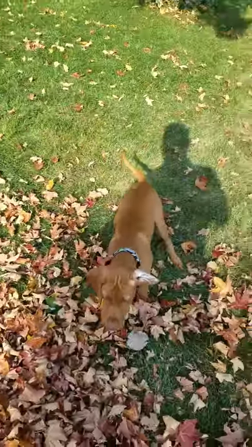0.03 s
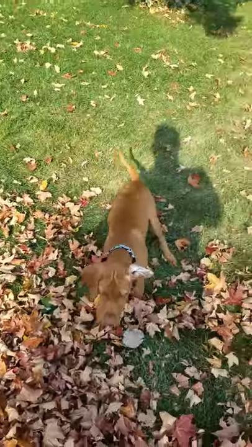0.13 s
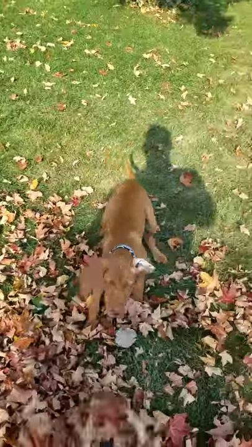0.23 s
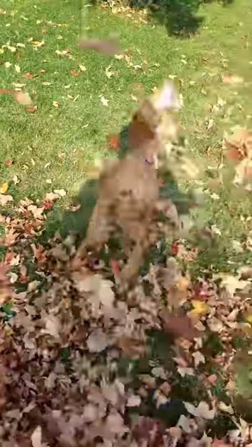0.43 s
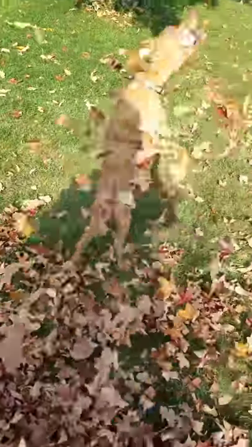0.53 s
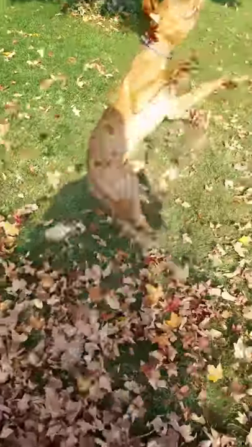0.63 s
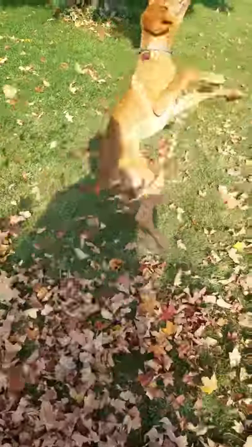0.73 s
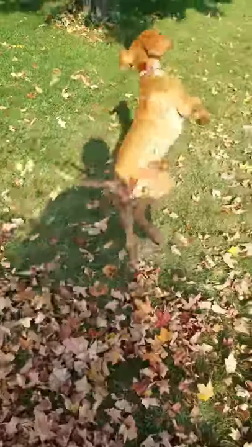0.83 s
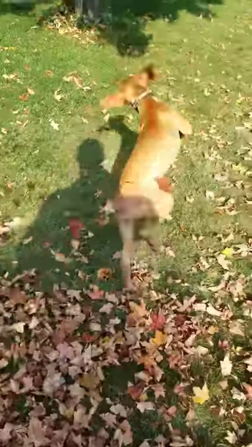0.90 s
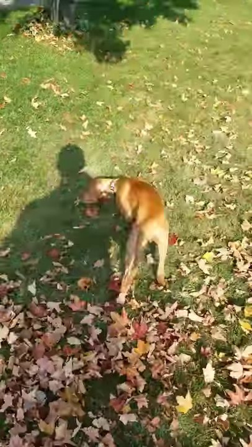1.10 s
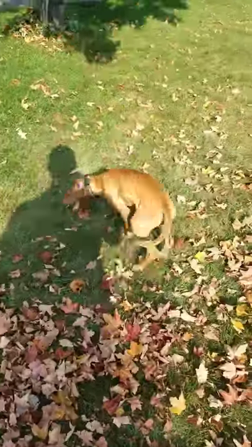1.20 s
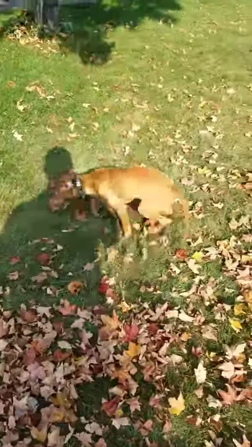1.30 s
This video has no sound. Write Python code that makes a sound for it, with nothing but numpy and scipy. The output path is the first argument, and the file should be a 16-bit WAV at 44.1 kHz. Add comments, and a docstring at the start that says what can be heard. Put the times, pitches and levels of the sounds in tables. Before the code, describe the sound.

A pile of dry leaves is kicked up with a loud swish close to the microphone, outdoors on grass. As the leaves flutter down, soft handling bumps come in, with a dog's crunching paw steps and a short huff.

```python
"""On a lawn, a foot ploughs into dry leaves and kicks them up. They patter down as a dog leaps, lands
and huffs. The rustle is thousands of tiny cracks, each reaching the two microphones from its own
direction, mostly from the right. Paws and a shoe thud on the turf, and the huff is a puff of noise
shaped by the dog's muzzle. A hand softly bumps the camera on the right, over a faint outdoor hiss."""
import sys
import numpy as np
from scipy import signal
from scipy.fft import rfft, irfft, next_fast_len
from scipy.io import wavfile
from scipy.ndimage import map_coordinates

SR = 44100
rng = np.random.default_rng(int(sys.argv[2]) if len(sys.argv) > 2 else 0)


def bounce(signal):
    """Save signal as a 16-bit WAV file at the path given by the first command-line argument."""
    frames = np.transpose(np.atleast_2d(signal))
    limited = np.clip(frames, -1, 1)
    pcm = np.round(limited * 32767).astype(np.int16)
    wavfile.write(sys.argv[1], SR, pcm)


N = 59535
TOP_HZ = 15750  # the highest pitch in the scene

# How loud the kick is. Each row: time in seconds, level in dB.
KICK_LEVEL = [(.12, -51), (.165, -38), (.198, -31), (.245, -26), (.30, -19), (.335, -19.5), (.363, -26.5),
              (.39, -39.5), (.46, -48)]
# Swells of sound. Each row: time of the peak in seconds, level in dB, rise and decay in seconds.
SHOE_SWELLS = [(.848, -34, 0.055, 0.051), (.947, -41, 0.0047, .007)]
PAW_SWELLS = [(.957, -38.5, .004, 0.0065), (.983, -46, 0.0037, 0.0113), (1.04, -39.5, 0.0095, 0.014),
              (1.06, -36.5, 0.0049, 0.0051), (1.069, -32.5, 0.0036, 0.013), (1.094, -39.5, 0.032, 0.041),
              (1.143, -35.5, 0.0065, 0.011), (1.165, -40.5, 0.014, 0.019), (1.206, -41.5, 0.012, 0.007),
              (1.213, -32.5, 0.0033, 0.0086), (1.236, -40.5, 0.0073, .008), (1.31, -37, 0.031, 0.02)]
HUFF_SWELLS = [(1.275, -42.5, 0.014, 0.023), (1.322, -38.5, 0.025, 0.017)]
# Single stems snap. Each row: time in seconds, strength in dB.
STEM_SNAPS = [(0.046, -43), (.105, -30), (.685, -29), (0.76, -45), (0.876, -44), (1.013, -35)]
# Paws and shoe hit the turf. Each row: time in seconds, strength in dB, pitch in Hz.
TURF_THUDS = [(.768, -35, 125), (.821, -35, 130), (.889, -43, 130), (1.122, -45, 130), (1.157, -40, 120),
              (1.314, -34, 220)]
# The hand bumps the camera. Each row: time in seconds, strength in dB.
HAND_BUMPS = [(0.679, -31.5), (0.704, -30), (.707, -24), (0.715, -33), (.735, -32), (.768, -32),
              (.782, -29.5), (0.819, -24), (.829, -32), (.841, -25), (0.864, -30), (.889, -32), (.926, -33),
              (0.946, -34), (1.157, -32), (1.173, -31.5), (1.215, -27), (1.227, -26.5), (1.331, -45),
              (1.342, -24)]
# How loud the moving hand rumbles. Each row: time in seconds, level in dB.
RUMBLE_LEVEL = [(0, -60), (.6, -59), (.71, -45.5), (.85, -47.5), (.98, -54.5), (1.1, -57), (1.22, -48),
                (1.27, -55), (1.34, -43)]

# The tone of each sound, from bass to treble. Each row: frequency in Hz, boost or cut in dB.
KICK_TONE = [(100, -16), (200, -18), (350, -4.5), (900, -2), (1800, 0.5), (3500, -2.5), (4800, 1),
             (7000, 1.5), (9000, -5), (11500, -1), (15500, -1)]
FALL_TONE = [(100, -15.5), (250, -8), (600, -2), (1200, -1.5), (2200, 2), (6000, -0.5), (9000, -4.5),
             (12000, -3), (15500, -0.5)]
PILE_TONE = [(100, -1), (400, -3), (800, 2.5), (1500, -4), (3200, -0.5), (4300, -3.5), (6000, 0.5),
             (9000, -15), (15000, -12.5)]
SHOE_TONE = [(100, -3), (500, -4), (1200, 5.5), (2300, 2), (3400, -0.5), (4200, -4), (5200, 0.5),
             (7000, -1.5), (9000, -6), (13000, -2.5), (15500, -4)]
PAW_TONE = [(100, -4), (400, -9), (1400, -2.5), (3000, -2.5), (7000, -5), (9500, -8.5), (13000, -5),
            (15500, -3.5)]
HUFF_TONE = [(300, -9), (900, -14), (1300, 0.5), (1550, -5), (1800, -1), (2200, -18), (4000, -32),
             (9000, -52)]
RUMBLE_TONE = [(20, -20), (45, -19), (90, 6.5), (160, -11), (350, 2), (700, -5), (2000, -24.5)]
AIR_TONE = [(100, 4.5), (500, 0.5), (1500, -0.5), (6000, -9), (9000, -10), (15000, -4)]

# How much later the left microphone hears the leaves as they fly away, and the dog as it moves off.
# Each row: time in seconds, delay in milliseconds.
LEAF_DELAY = [(0, 0.35), (.2, 0.31), (.3, 0.29), (.37, .23), (.75, .19)]
DOG_DELAY = [(1.0, 0.15), (1.32, 0.053)]
# How much louder the left microphone is than the right. Each row: frequency in Hz, amount in dB.
MIC_BALANCE = [(200, 1.5), (1500, -1.5), (2800, -0.5), (3700, -1.5), (4500, -3.5), (5500, -4), (6800, -3),
               (8000, 0.5), (10500, -2), (13000, -1), (15500, -2)]


def kicked_leaves():
    """Thousands of leaves slide over each other as the heap flies up."""
    leaves = rustle(KICK_TONE, rate=26000, scatter_db=1.3, clump_db=0.33,
                    delay=LEAF_DELAY, spread_ms=.024)
    return amp(curve(KICK_LEVEL)) * swish(leaves)


def swish(sound, centre_s=0.307, centre_hz=3300, octaves_per_s=8, width_octaves=0.72, lift_db=4):
    """A broad band of the rustle is boosted, and climbs in pitch as the heap opens up."""
    hz, t, spectrum = signal.stft(sound, SR, nperseg=256)
    octaves_away = np.log2((hz[:, None] + 1) / centre_hz) - octaves_per_s * (t - centre_s)
    boost = amp(lift_db * np.exp(-(octaves_away / width_octaves) ** 2))
    _, swept = signal.istft(spectrum * boost, SR, nperseg=256)
    return unit(swept[:, :N])


def falling_leaves(peak_s=0.373, rise_s=0.062, level_db=-30.5, fade_db_per_s=17):
    """Leaves flutter down and settle, ever fewer and softer."""
    age = clock() - peak_s
    rise = np.clip(1 + age / rise_s, 0, 1)
    fade = amp(level_db - fade_db_per_s * np.maximum(age, 0))
    return rise * fade * rustle(FALL_TONE, rate=33000, scatter_db=1.0, clump_db=1.05,
                                delay=LEAF_DELAY, spread_ms=.1, thinning_per_s=1)


def ploughing_foot():
    """The foot pushes through the pile before the kick, making a dull crunch inside it."""
    level_db = curve([(0, -51.5), (.03, -44), (.254, -44), (.336, -90)])
    crunch = rustle(PILE_TONE, rate=8000, scatter_db=1.0, clump_db=1.36,
                    delay=LEAF_DELAY, spread_ms=0.064)
    return amp(level_db) * crunch * left_right(-1.5, 1)


def landing_shoe():
    """The shoe sinks back into the pile and crushes leaves."""
    return swells(SHOE_SWELLS) * rustle(SHOE_TONE, rate=9000, scatter_db=1.5, clump_db=1.0,
                                        delay=[(0, .4)], spread_ms=0.015)


def paw_steps():
    """Each paw presses a swell of cracks out of the leaves."""
    return swells(PAW_SWELLS) * rustle(PAW_TONE, rate=7000, scatter_db=3, clump_db=0.7,
                                       delay=DOG_DELAY, spread_ms=.08)


def snapping_stems(cracks_each=8):
    """Each stem gives way in a quick run of cracks."""
    snap_s, db = np.transpose(STEM_SNAPS)
    times = snap_s[:, None] + rng.uniform(-0.00042, .0012, (len(snap_s), cracks_each))
    sizes = np.repeat(amp(db), cracks_each)
    return with_tone(cracks(times.ravel(), sizes, delay_ms=0.9, spread_ms=0.062), PILE_TONE)


def turf_thuds(width_s=.004):
    """Soft turf shakes just once or twice under each paw or shoe."""
    t, thuds = clock(), np.zeros(N)
    for hit_s, db, hz in TURF_THUDS:
        age = t - hit_s
        thuds -= amp(db) * np.exp(-(age / width_s) ** 2) * np.cos(2 * np.pi * hz * age)
    return thuds * left_right(-1.5, -1.5)


def dog_huff():
    """A short puff of breath rings at two pitches in the dog's muzzle, straight ahead."""
    return swells(HUFF_SWELLS) * noise(HUFF_TONE, channels=1)


def hand_on_camera(bump_s=0.00089):
    """Each bump is a short dip in pressure at the right microphone; the moving hand adds a rumble."""
    t, bumps = clock(), np.zeros(N)
    widths = bump_s * np.exp(rng.normal(0, .12, len(HAND_BUMPS)))
    for (hit_s, db), width in zip(HAND_BUMPS, widths):
        offset = (t - hit_s) / width
        dip = np.exp(-offset ** 2)
        rebound = np.exp(-(offset / 5) ** 2) / 5  # wide and shallow, it balances the dip
        bumps += amp(db) * (rebound - dip)
    rumble = amp(curve(RUMBLE_LEVEL)) * noise(RUMBLE_TONE)
    return bumps * left_right(-31, 0) + rumble * left_right(-1.5, 1.5)


def lawn_air(level_db=-50.5):
    """The faint, steady hiss of the open lawn."""
    return amp(level_db) * noise(AIR_TONE)


def rustle(tone, rate, scatter_db, clump_db, delay, spread_ms, thinning_per_s=0):
    """Leaves crack at random, in louder and softer clumps, starting at `rate` cracks a second."""
    density = rate * np.exp(-thinning_per_s * clock())
    count_so_far = np.cumsum(density) / SR
    when, strength = rng.random((int(count_so_far[-1]), 2)).T
    times = np.interp(when * count_so_far[-1], count_so_far, clock())
    sizes = amp(-scatter_db * np.log(strength + .01))  # many small cracks, a few big ones
    delay_ms = np.interp(times, *np.transpose(delay))
    stream = cracks(times, sizes, delay_ms, spread_ms) / np.sqrt(density)  # as loud when it thins
    clumps = amp(clump_db * wobble(220))
    return unit(with_tone(stream * clumps, tone))


def cracks(times, sizes, delay_ms, spread_ms, ring_s=0.00015, lean_db=1.5, samples=48):
    """Each crack is a tiny ring that dies at once, with its own pitch and its own direction."""
    pitch, phase, direction, lean = rng.random((len(times), 4)).T
    stray = np.log((direction + 1e-6) / (1 - direction + 1e-6)) / 2  # usually close to zero
    delay_s = (delay_ms + spread_ms * stray) / 1000
    tilt_db = lean_db * (lean - .5)  # a little louder on one side
    sides = []
    for arrival, gain in ((times + delay_s, amp(tilt_db)), (times, amp(-tilt_db))):
        start = np.abs(arrival)[:, None]
        index = np.ceil(start * SR).astype(int) + np.arange(samples)
        age = index / SR - start
        envelope = 2 * age / ring_s * np.exp(1 - 2 * age / ring_s)
        wave = np.sin(2 * np.pi * (TOP_HZ * pitch[:, None] * age + phase[:, None]))
        rings = envelope * wave * (sizes * gain)[:, None]
        sides.append(np.bincount(index.ravel(), rings.ravel(), N)[:N])
    return np.array(sides)


def swells(rows):
    """One loudness curve made of swells that each rise to a peak and die away."""
    t, power = clock(), np.zeros(N)
    for peak_s, db, rise_s, decay_s in rows:
        age = t - peak_s
        drop = np.where(age < 0, (age / rise_s) ** 2, age / decay_s)
        power += (amp(db) * np.exp(-drop)) ** 2
    return np.sqrt(power)


def noise(tone, channels=2):
    """Steady noise with the given tone."""
    return unit(with_tone(rng.standard_normal((channels, N)), tone))


def wobble(rate):
    """A smooth curve through `rate` random points a second."""
    points = rng.standard_normal(int(N * rate / SR) + 4)
    return map_coordinates(points, [clock() * rate])


def with_tone(sound, tone):
    """Boost and cut a sound's frequencies as a tone table says."""
    return filtered(sound, lambda hz: amp(db_at(tone, hz)))


def filtered(sound, gain_at):
    """Multiply each frequency in a sound by gain_at(hz)."""
    size = next_fast_len(N + 8192)
    hz = np.fft.rfftfreq(size, 1 / SR)
    return irfft(rfft(sound, size) * gain_at(hz), size)[..., :N]


def db_at(rows, hz):
    """Read between rows of frequency and dB, giving each octave equal room."""
    row_hz, row_db = np.transpose(rows)
    return np.interp(np.log(hz + 1), np.log(row_hz + 1), row_db)


def curve(rows):
    """Join rows of time and value with straight lines."""
    return np.interp(clock(), *np.transpose(rows))


def clock():
    """The time of every sample, in seconds."""
    return np.arange(N) / SR


def left_right(left_db, right_db):
    """A gain for each side."""
    return amp([[left_db], [right_db]])


def amp(db):
    """Turn decibels into a gain to multiply by."""
    return 10 ** (np.asarray(db) / 20)


def unit(sound):
    """Scale a sound so that its average size (rms) is 1."""
    return sound / np.sqrt(np.mean(sound ** 2) + 1e-20)


def scene():
    """Leaves and air, with a slightly different tone on each side, plus the huff and the low knocks."""
    rustling = (lawn_air() + ploughing_foot() + landing_shoe() + kicked_leaves()
                + falling_leaves() + paw_steps() + snapping_stems())
    share = np.array([[.5], [-.5]])  # half added on the left, half taken from the right
    rustling = filtered(rustling, lambda hz: amp(db_at(MIC_BALANCE, hz) * share))
    return rustling + dog_huff() + turf_thuds() + hand_on_camera()


def record(dry, low_cut_hz=48):
    """The camera weakens the deep bass and keeps nothing above TOP_HZ."""
    return filtered(dry, lambda hz: hz ** 2 / np.hypot(hz ** 2, low_cut_hz ** 2) * (hz < TOP_HZ))


dry = scene()
out = record(dry)
bounce(out)
```